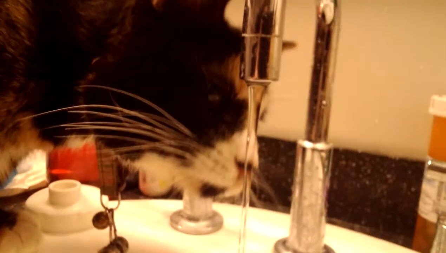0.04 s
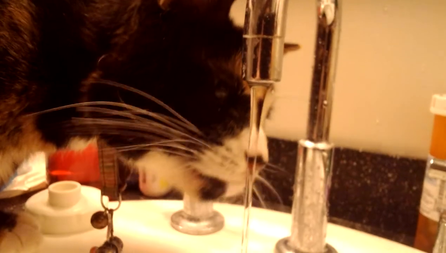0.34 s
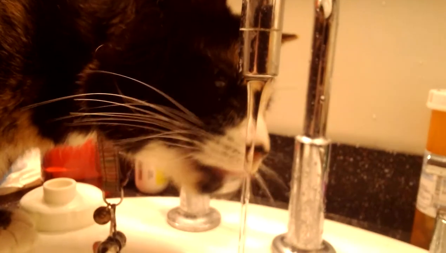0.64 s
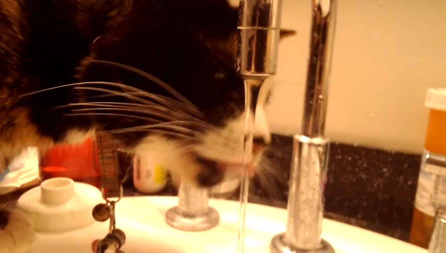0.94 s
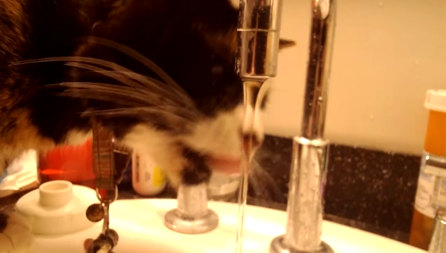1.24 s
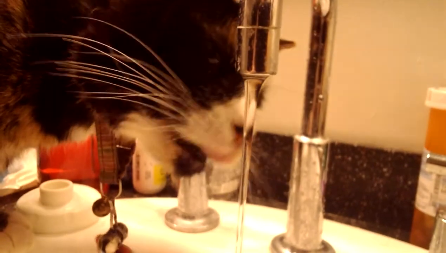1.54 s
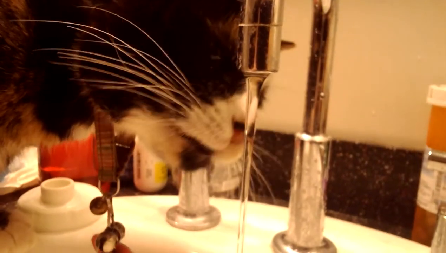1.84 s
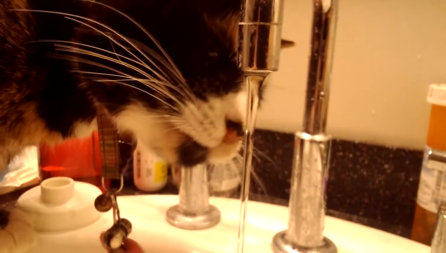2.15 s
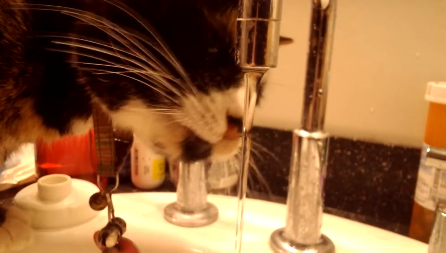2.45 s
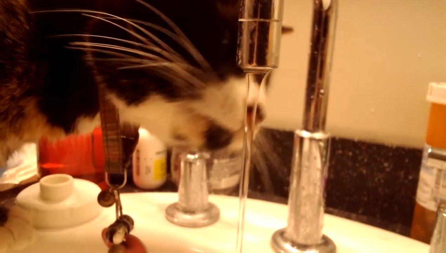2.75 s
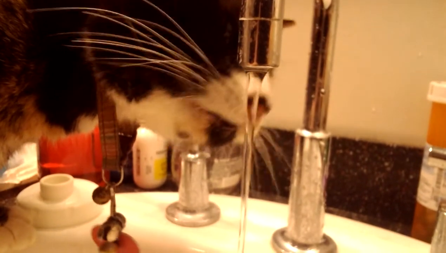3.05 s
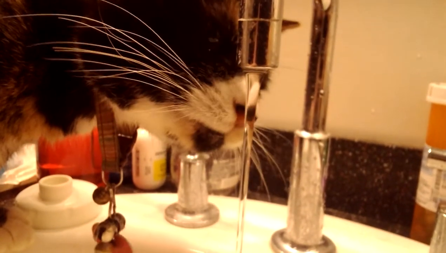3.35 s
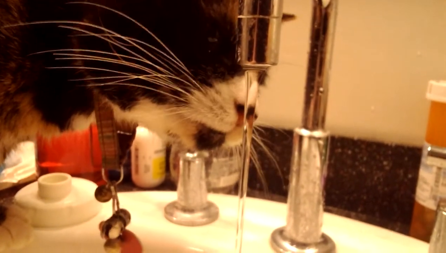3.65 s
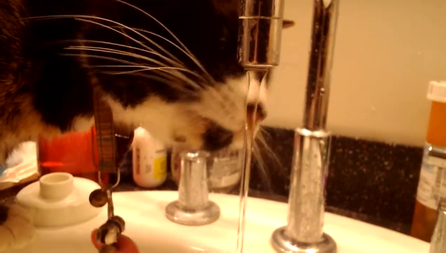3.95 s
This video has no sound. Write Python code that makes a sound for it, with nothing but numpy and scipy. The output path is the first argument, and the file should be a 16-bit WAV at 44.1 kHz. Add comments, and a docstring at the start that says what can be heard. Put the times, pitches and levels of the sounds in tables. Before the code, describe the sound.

A cat laps from a thin stream at a bathroom tap, close to the microphone, with quick wet clicks and fine crackle. One hollow plop comes near the end. Faint trickling and a low hum continue underneath.

```python
"""Wet licks, close up: a cat laps from a thin stream at a bathroom tap.
Each lick is a patch of tiny bubbles and tongue crackle, with sharp clicks as water films snap.
A few larger bubbles plink; near the end an air pocket opens with one hollow plop.
Basin and walls throw the clicks back, over trickling water, a faint rush, motor hum and hiss."""
import sys
import numpy as np
from scipy import signal
from scipy.fft import rfft, irfft
from scipy.io import wavfile

SR = 44100
rng = np.random.default_rng(int(sys.argv[2]) if len(sys.argv) > 2 else 0)


def waveform_to_disk(signal):
    """Save audio, clipped to [-1, 1], as 16-bit WAV at the path in sys.argv[1]."""
    frames = np.transpose(np.atleast_2d(signal))
    scaled = np.clip(frames, -1, 1) * 32767
    samples = np.round(scaled).astype(np.int16)
    wavfile.write(sys.argv[1], SR, samples)


N = 176400

# tongue strokes (start [s], length [s], bubble level [dB], crackle level [dB])
LICK_STROKES = [(0.054,0.25,-57.5,-63),(0.599,0.18,-53,-72),(0.925,0.13,-50,-61.5),(1.163,0.15,-56.5,-57.5),(1.351,0.091,-59,-63),(1.529,0.19,-60,-60),(1.797,0.26,-61.5,-58.5),(2.137,.22,-57.5,-59),(2.434,0.2,-56.5,-60.5),(2.743,0.29,-59,-57.5),(3.219,0.13,-70,-56),(3.516,0.29,-58.5,-59)]
LICK_RISE_S, LICK_FALL_S, LICK_FLOOR_DB = .015, .08, -67.5
BUBBLES_PER_S, BUBBLE_HZ, BUBBLE_LOG_SPREAD = 750, 8390, .12
BUBBLE_RISE_S, GLIDE_PER_S = .0001, 6.7
# tongue crackle spectrum (frequency [Hz], level [dB])
CRACKLE_SPECTRUM = [(500,2.5),(1500,-9),(2800,-6),(4500,-0.5),(6000,-12.5),(8500,2.5),(11500,-10),(14000,-1.5),(16000,-8)]
CRACKLES_PER_S, CRACKLE_DECAY_S = 260, .0011

# wet clicks (time [s], bubble and snap level [dB], bubble pitch [Hz], smack level [dB], tick level [dB])
WET_CLICKS = [(0.0817, -37, 8000, -57, -51), (0.2268, -42, 8700, -60, -46.5), (0.2514, -33, 8500, -53, -57),
              (0.3105, -45, 9000, -64, -50), (0.3949, -39, 11400, -66, -51), (0.61, -32, 11900, -64, -42),
              (0.63, -30, 8060, -62, -56), (0.665, -33, 10200, -58, -42), (0.6729, -7.5, 9800, -66, -30),
              (0.7666, -38, 9300, -55, -64), (0.839, -31.5, 8250, -59, -44), (0.9148, -38, 9600, -47, -50),
              (0.9415, -21, 10600, -61, -44), (0.9566, -27, 8240, -57, -61),
              (1.0263, -30.5, 7800, -60, -56), (1.1428, -20, 9230, -65, -38),
              (1.2439, -19.5, 8000, -51, -47), (1.3982, -44, 8780, -63, -45), (1.4164, -35, 9400, -56, -43),
              (1.4611, -10, 8250, -41, -29.5), (1.5221, -28, 8500, -56, -48),
              (1.5636, -27.5, 11200, -40, -44), (1.5987, -27, 9460, -41.5, -53),
              (1.6706, -31.5, 9400, -53, -50), (1.8382, -34, 9800, -53, -51), (1.8538, -18, 7950, -46, -45),
              (1.945, -35, 8060, -51, -50), (1.9603, -30, 10000, -58, -38), (2.0578, -54, 7850, -56, -48),
              (2.1829, -32.5, 7900, -63, -61), (2.2582, -24.5, 8700, -45, -38),
              (2.272, -24, 9430, -42, -39), (2.295, -31, 8840, -52, -44), (2.326, -28.5, 9060, -61, -43),
              (2.582, -29.5, 8070, -46, -42), (2.6375, -33, 9000, -64, -58), (2.6888, -32, 8140, -52, -49),
              (2.814, -37, 9700, -57, -55), (2.8496, -30, 10500, -56, -42), (2.8722, -33, 8880, -45, -52),
              (2.9348, -32, 8630, -53, -58), (2.9518, -41, 8760, -46, -58), (2.9787, -35, 8700, -58, -56),
              (2.9968, -35, 9250, -61, -43), (3.0008, -39, 9150, -55, -66), (3.2856, -26, 8530, -53, -52),
              (3.306, -6.5, 7900, -38.5, -26.5), (3.5582, -36, 9840, -63, -46),
              (3.5867, -34, 7760, -60, -67), (3.6557, -28, 8230, -56, -56),
              (3.7661, -29.5, 9700, -58, -36.5), (3.81, -37, 8510, -66, -62), (3.8334, -35, 7800, -50, -60)]
CLICK_TRIM_DB, SMACK_TRIM_DB, TICK_TRIM_DB, SNAP_GAIN = -1.5, 6, 11.5, .47
# film snap spectrum (frequency [Hz], level [dB])
SNAP_SPECTRUM = [(500,-72),(3500,-47),(4800,-15),(5700,-14),(6700,-3),(8500,8.5),(10500,-1),(12500,-10),(16000,-22)]
# tongue smack spectrum (frequency [Hz], level [dB])
SMACK_SPECTRUM = [(300,-24),(1200,-9.5),(2800,-2.5),(5000,2),(7000,3),(16000,-15)]
# high tick spectrum (frequency [Hz], level [dB])
TICK_SPECTRUM = [(500,-72),(4500,-54),(7500,-29),(10000,-9.5),(11500,-2),(14000,-5),(16000,-1.5)]
# larger bubbles (time [s], level [dB], pitch [Hz])
PLINK_BUBBLES = [(2.0725, -42, 3000), (2.1276, -38.5, 3700), (2.152, -34, 3100), (3.0949, -44, 2840),
                 (3.2206, -50, 3380), (3.5313, -44, 2800)]
PLINK_TRIM_DB = -3

# air pocket modes (frequency [Hz], level [dB], T60 [s])
POCKET_MODES = [(798,-5.5,0.11),(840,4.5,0.059),(888,-8,0.022),(950,-13.5,0.12)]
# air pocket opening tick spectrum (frequency [Hz], level [dB])
POCKET_TICK_SPECTRUM = [(500,-15),(1450,-2),(2100,-17),(2900,-8),(4000,-20),(16000,-45)]
PLOP_AT_S, PLOP_RISE_S, PLOP_GAIN_DB, PLOP_TICK_DB = 3.697, .0034, -18.5, -40.5

# reflections off tap, basin and wall (delay [s], gain [ratio])
NEAR_ECHOES = [(.0006,0.15),(.0011,-0.55),(.0021,0.21),(.0026,-0.28),(.0042,0.26),(.0076,0.35),(.0088,-0.26)]
# room decay (frequency [Hz], T60 [s])
ROOM_DECAY = [(200,0.41),(1000,0.56),(7000,0.22),(10000,0.12),(16000,0.16)]
ROOM_BUILD_S, MOUTH_SEND_DB, PLOP_SEND_DB = .0065, -9.5, -24

# basin resonances under the stream (frequency [Hz], bandwidth [Hz], rms level [dB])
BASIN_MODES = [(313,29,-61.5),(406,33,-61),(564,30,-63),(851,82,-64.5),(970,29,-66.5)]
DROPS_PER_S, SURGE_DB, SURGE_HZ = 250, 4.5, 7
# hollow rush envelope (time [s], rms level [dB])
RUSH_ENVELOPE = [(0,-79),(.8,-78),(0.999,-64.5),(1.351,-63),(1.65,-78),(2.701,-76),(2.9,-66),(3.3,-66),(3.601,-85),(4,-78)]
RUSH_HZ, RUSH_DAMPING_PER_S = 1172, 904.8
# mains and motor tones (frequency [Hz], level [dB])
HUM_TONES = [(60,-55),(86.4,-45),(93.6,-44),(120,-33),(146.4,-51),(153.6,-48),(180,-39),(240,-55),(247,-60),(420,-65),(480,-68),(598,-69)]
HUM_TRIM_DB, WAVER_DEPTH, WAVER_HZ = -.5, .086, 2.61
# steady air and hiss spectrum (frequency [Hz], relative density [dB])
AIR_SPECTRUM = [(20,-14),(45,-16),(65,8),(90,8),(130,6),(200,-5),(270,-3.5),(340,-8.5),(430,-12),(560,-16),(720,-15.5),(860,-16.5),(980,-17),(1120,-22.5),(1800,-28),(3000,-30.5),(4200,-32),(4700,-24),(5150,-18),(5800,-33.5),(7000,-32.5),(8400,-26),(11000,-33),(15000,-37.5),(16500,-72)]
AIR_RMS_DB, BAND_LIMIT_HZ = -43.5, 15700


def licks():
    """Each stroke stirs up tiny bubbles and the crackle of a wet tongue."""
    t = np.arange(N) / SR
    bubble_env, crackle_env = np.zeros((2, N)) + amp(LICK_FLOOR_DB)
    for start_s, length_s, bubble_db, crackle_db in LICK_STROKES:
        stroke = np.clip((t - start_s) / LICK_RISE_S, 0, 1)
        stroke *= np.clip((start_s + length_s - t) / LICK_FALL_S + .5, 0, 1)
        bubble_env = np.maximum(bubble_env, stroke * amp(bubble_db))
        crackle_env = np.maximum(crackle_env, stroke * amp(crackle_db))
    pitches_hz = BUBBLE_HZ * np.exp(BUBBLE_LOG_SPREAD * rng.standard_normal(60))
    bubbles = np.zeros(N)
    for hz in np.minimum(pitches_hz, BAND_LIMIT_HZ):
        births = impulses(BUBBLES_PER_S / len(pitches_hz), spread_db=7)
        bubbles += signal.oaconvolve(births, bubble(hz, ring_s=.0004))[:N]
    pole = np.exp(-1 / (CRACKLE_DECAY_S * SR))
    bursts = signal.lfilter([1], [1, -pole], impulses(CRACKLES_PER_S, spread_db=5.5))
    crackle = bursts * noise(CRACKLE_SPECTRUM)
    return bubble_env * unit_rms(keep_treble(bubbles)) + crackle_env * unit_rms(crackle)


def clicks():
    """A water film snaps with a high tick, the bubble under it rings, the tongue smacks."""
    out = np.zeros(N)
    for at_s, db, hz, smack_db, tick_db in WET_CLICKS:
        gain = amp(db + CLICK_TRIM_DB)
        add(out, at_s + .0005, gain * keep_treble(bubble(hz, ring_s=.00032)))
        snap = gain * SNAP_GAIN * burst(SNAP_SPECTRUM, decay_s=.00056)
        smack = amp(smack_db + SMACK_TRIM_DB) * burst(SMACK_SPECTRUM, decay_s=.00076)
        tick = amp(tick_db + TICK_TRIM_DB) * burst(TICK_SPECTRUM, decay_s=.00045)
        add(out, at_s - .0008, snap + smack + tick)
    return out


def plinks():
    """Larger bubbles ring lower and a little longer."""
    out = np.zeros(N)
    for at_s, db, hz in PLINK_BUBBLES:
        add(out, at_s, amp(db + PLINK_TRIM_DB) * bubble(hz, ring_s=.0011, rise_s=.0004))
    return out


def plop():
    """One large air pocket opens with a faint tick and rings low and hollow."""
    out, t = np.zeros(N), np.arange(SR // 5) / SR
    ring = sum(amp(db - 60 * t / t60_s) * np.sin(2 * np.pi * hz * t) for hz, db, t60_s in POCKET_MODES)
    ring *= np.minimum(t / PLOP_RISE_S, 1)
    add(out, PLOP_AT_S, amp(PLOP_GAIN_DB) * highpass(ring, order=2, cut_hz=630))
    add(out, PLOP_AT_S - .001, amp(PLOP_TICK_DB) * burst(POCKET_TICK_SPECTRUM, decay_s=.003))
    return out


def bubble(hz, ring_s, rise_s=BUBBLE_RISE_S):
    """Damped sine; pitch climbs as the bubble surfaces."""
    t = np.arange(1024) / SR
    pitch_hz = hz * (1 + GLIDE_PER_S * np.minimum(t, 2 * ring_s))
    env = (1 - np.exp(-(t / rise_s) ** 2)) * np.exp(-t / ring_s)
    return env / env.max() * np.sin(2 * np.pi * np.cumsum(pitch_hz) / SR)


def keep_treble(x):
    """Steep high-pass near 6 kHz keeps the tiny bubbles thin and bright."""
    return highpass(x, order=6, cut_hz=6100)


def burst(spectrum, decay_s):
    """Short coloured crack, onset 1.5 ms in; decay time sets its energy."""
    env = np.exp(-np.arange(1024) / SR / decay_s)
    crack = np.roll(env * rng.choice([-1, 1], len(env)), 64)
    crack = colour(crack, spectrum) * signal.windows.tukey(len(env), .1)
    return crack * np.linalg.norm(env) / np.linalg.norm(crack)


def near_echoes(x):
    """Direct sound plus first reflections off hard surfaces nearby."""
    out = x.copy()
    for delay_s, gain in NEAR_ECHOES:
        add(out, delay_s, gain * x)
    return out


def room(x):
    """Short tail of a small tiled room; treble dies first."""
    hz, t, frames = signal.stft(rng.standard_normal(SR // 2), SR, nperseg=256)
    frames *= amp(-60 * t / log_interp(ROOM_DECAY, hz)[:, None])
    tail = signal.istft(frames, SR, nperseg=256)[1]
    tail *= np.minimum(np.arange(len(tail)) / SR / ROOM_BUILD_S, 1)
    return signal.fftconvolve(x, tail / np.linalg.norm(tail))[:N]


def trickle():
    """The stream lands in uneven surges and rings the hollow of the basin."""
    out, t = np.zeros(N), np.arange(SR // 10) / SR
    for hz, width_hz, db in BASIN_MODES:
        ring = (1 - np.exp(-t * hz)) * np.exp(-np.pi * width_hz * t) * np.sin(2 * np.pi * hz * t)
        drops = impulses(DROPS_PER_S, spread_db=4) * rng.choice([-1, 1], N)
        drops *= amp(SURGE_DB * wander(SURGE_HZ))
        out += amp(db) * unit_rms(signal.oaconvolve(drops, ring)[:N])
    return out


def rush():
    """Faint hollow noise band; swells and fades."""
    t = np.arange(SR // 20) / SR
    ring = t * np.exp(-RUSH_DAMPING_PER_S * t) * np.sin(2 * np.pi * RUSH_HZ * t)
    env = amp(np.interp(np.arange(N) / SR, *np.transpose(RUSH_ENVELOPE)))
    return env * unit_rms(signal.oaconvolve(rng.standard_normal(N), ring)[:N])


def hum():
    """Mains harmonics and motor tones, beating and wavering slightly."""
    out, t = np.zeros(N), np.arange(N) / SR
    for hz, db in HUM_TONES:
        waver = 1 + WAVER_DEPTH * wander(WAVER_HZ)
        tone = np.sqrt(2) * np.sin(2 * np.pi * (hz * t + rng.random()))
        out += amp(db + HUM_TRIM_DB) * waver * tone
    return out


def air():
    """Steady low air noise and hiss."""
    return amp(AIR_RMS_DB) * noise(AIR_SPECTRUM)


def impulses(per_s, spread_db):
    """Random impulses of uneven strength."""
    hits = rng.random(N) < per_s / SR
    return hits * amp(spread_db * np.minimum(rng.exponential(1, N), np.pi))


def wander(rate_hz):
    """Slow random drift."""
    return np.interp(np.arange(N) / SR * rate_hz, np.arange(128), rng.standard_normal(128))


def noise(spectrum):
    """Coloured noise, rms 1."""
    return unit_rms(colour(rng.standard_normal(N), spectrum))


def colour(x, spectrum):
    """Zero-phase filter from a spectrum table."""
    hz = np.fft.rfftfreq(len(x), 1 / SR)
    return irfft(rfft(x) * amp(log_interp(spectrum, hz)), len(x))


def highpass(x, order, cut_hz):
    """Maximally flat high-pass."""
    return signal.sosfilt(signal.butter(order, cut_hz, "high", fs=SR, output="sos"), x)


def log_interp(table, hz):
    """Table lookup on a log-frequency axis."""
    knots_hz, values = np.transpose(table)
    return np.interp(np.log(hz + 1), np.log(knots_hz + 1), values)


def add(mix, at_s, sound):
    """Mixes a sound in, in place."""
    part = mix[max(round(at_s * SR), 0):][:len(sound)]
    part += sound[:len(part)]


def amp(db):
    """Decibels to gain."""
    return 10 ** (np.asarray(db) / 20)


def unit_rms(x):
    """Scales to rms 1."""
    return x / np.sqrt(np.mean(x ** 2) + 1e-20)


def scene():
    """Lapping and plop in the bathroom, over the background; mono."""
    mouth = licks() + clicks() + plinks()
    pocket = plop()
    reverb = room(amp(MOUTH_SEND_DB) * mouth + amp(PLOP_SEND_DB) * pocket)
    return (near_echoes(mouth) + pocket + reverb + trickle() + rush() + hum() + air())[None]


def record(dry):
    """Linear-phase low-pass at the band limit."""
    lowpass = signal.firwin(255, BAND_LIMIT_HZ, window=("kaiser", 8), fs=SR)
    return signal.oaconvolve(dry, lowpass[None], "same")


dry = scene()
out = record(dry)
waveform_to_disk(out)
```